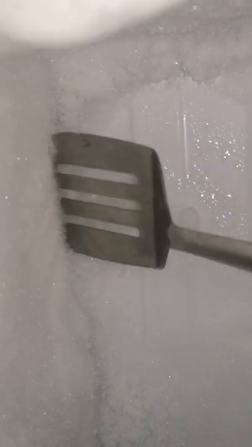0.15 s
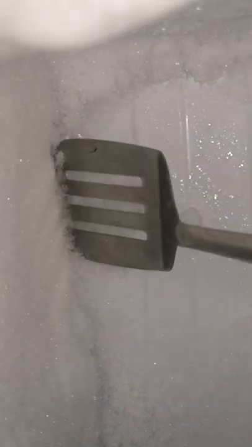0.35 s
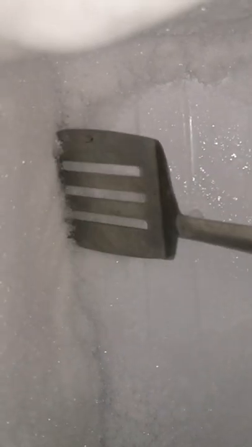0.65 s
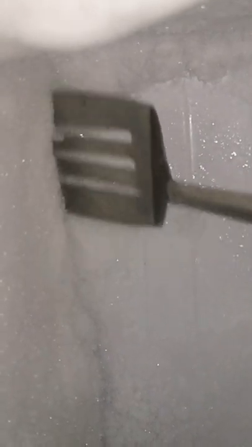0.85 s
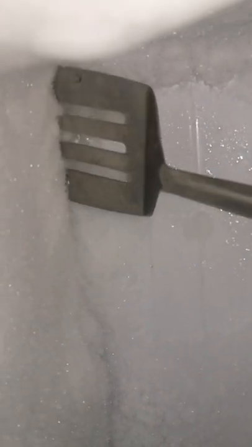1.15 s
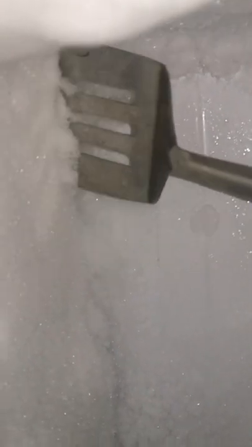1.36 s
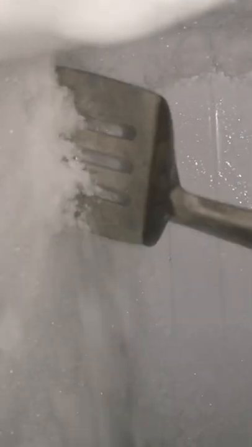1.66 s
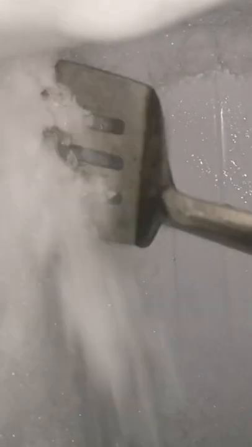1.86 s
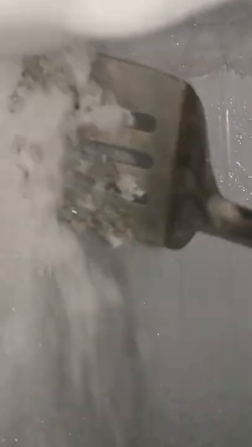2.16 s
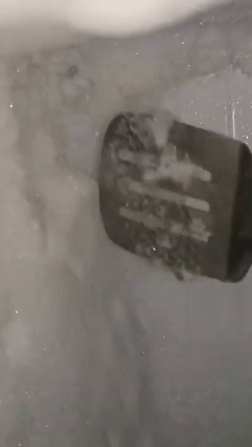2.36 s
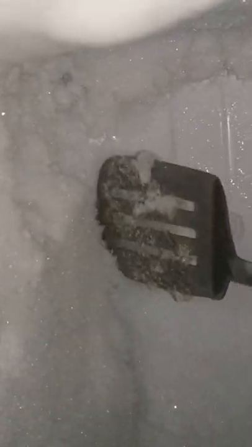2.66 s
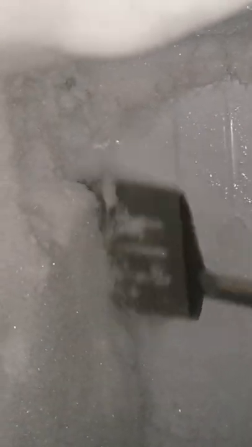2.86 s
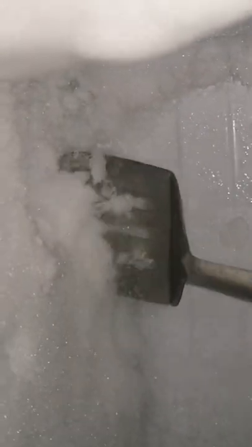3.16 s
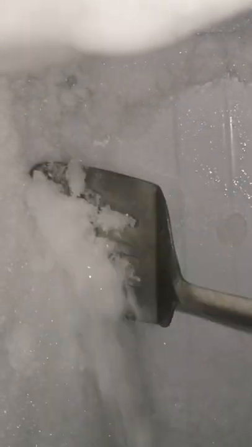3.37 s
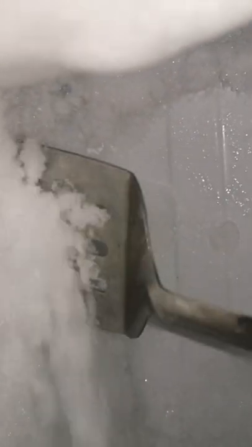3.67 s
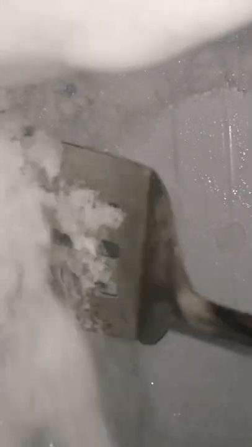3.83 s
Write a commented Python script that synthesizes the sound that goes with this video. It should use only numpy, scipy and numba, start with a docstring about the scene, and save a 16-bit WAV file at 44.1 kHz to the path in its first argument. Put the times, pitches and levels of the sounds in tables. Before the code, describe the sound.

A metal spatula scrapes freezer frost: light ticking scratches first, then a long gritty stroke, a short pause with falling crumbs, and a louder crunching stroke. Close stereo microphone inside the compartment, faint low hum underneath.

```python
"""Inside a freezer, close to a slotted metal spatula, in stereo: compressor hum and cabinet rumble lie underneath throughout.
First come light pecks at the frosted wall: ice fractures rattle the blade, which rings openly, and the hollow wall booms.
From about 1.2 s a long stroke digs in, the edge sticking and slipping; each slip is a run of tiny fractures.
Around 2.2 to 2.8 s crumbs patter down and larger chips tick as they land; then a second, louder stroke runs to the end.
Bursts of random clicks drive the blade and wall resonances; falling frost is short ticks, the hum is sine lines."""
import sys
import numpy as np
from scipy import signal
from scipy.fft import rfft, irfft, next_fast_len
from scipy.io import wavfile
from numba import njit

SR = 44100
rng = np.random.default_rng(int(sys.argv[2]) if len(sys.argv) > 2 else 0)


def log_audio(samples):
    """Write samples as a 16-bit WAV file to the path given in sys.argv[1]."""
    # one column per channel
    frames = np.atleast_2d(samples).T
    # limit to full scale, then quantise
    limited = np.clip(frames, -1, 1)
    pcm = np.round(limited * 32767).astype(np.int16)
    wavfile.write(sys.argv[1], SR, pcm)


N = 176400

# Compressor's steady hum lines: f/Hz, level/dB (rms)
HUM_LINES = [(46.5, -60), (147.6, -59)]
# Its strongest line swells and sinks: t/s, level/dB (rms)
DRONE_LEVEL = [(0, -48), (.12, -45), (.4, -44), (.52, -52), (.8, -48.5), (1.05, -41.5), (1.3, -49),
               (1.55, -42.5), (2.0, -46.5), (2.33, -42), (2.52, -51), (2.74, -52.5), (2.95, -37.5),
               (3.2, -46.5), (4, -48)]
DRONE_HZ = 98.5
# Loose rumble of the cabinet: f/Hz, t60/s, level/dB (rms)
RUMBLE_MODES = [(19.8, .5, -60), (44.8, 1, -46.5), (68.6, 0.15, -51.5)]
# Outline of the room tone: f/Hz, relative level/dB
ROOM_OUTLINE = [(15, -12), (35, -3), (65, 3), (110, 12), (180, -12), (300, -8), (700, -33), (2500, -34),
                (7000, -30), (15000, -63)]
ROOM_DB = -58  # rms

# Slips of the edge through the frost: t/s, length/s, drive level/dB, brightness/dB (before HISS_DB)
EDGE_SLIPS = [(0.005, 0.081, -37.5, -14), (0.12, 0.018, -37.5, -12.5), (0.146, 0.0073, -34, -16.5),
              (0.264, 0.021, -45.5, -8), (0.366, 0.05, -45.5, -10), (0.417, 0.042, -52.5, -7.5),
              (0.54, 0.042, -43, -12), (0.583, 0.025, -40.5, -9.5), (0.614, 0.024, -43, -10.5),
              (0.663, 0.018, -41, -15), (0.74, 0.048, -50, -14.5), (0.807, 0.0092, -44, -14),
              (0.882, 0.035, -41.5, -8), (0.941, 0.015, -32.5, -9), (0.994, 0.047, -44, -5.5),
              (1.069, 0.008, -37, -9.5), (1.082, 0.03, -42, -6), (1.115, 0.05, -29, -12.5),
              (1.168, 0.024, -37, -10.5), (1.225, 0.016, -25, -7.5), (1.275, 0.018, -29.5, -11.5),
              (1.305, 0.005, -26, -15), (1.311, 0.0076, -25, -8), (1.335, 0.039, -26.5, -7),
              (1.406, 0.047, -25.5, -9), (1.459, 0.027, -24.5, -10), (1.5, 0.032, -25.5, -13.5),
              (1.56, 0.051, -25, -9), (1.638, 0.071, -25.5, -8), (1.717, 0.085, -27.5, -9),
              (1.816, 0.017, -30, -14), (1.864, 0.09, -27, -10.5), (1.933, 0.058, -24, -8.5),
              (2.01, 0.012, -27.5, -11), (2.079, 0.11, -25.5, -10.5), (2.199, 0.0074, -27, -11),
              (2.252, 0.021, -32.5, -17), (2.287, 0.039, -35.5, -8.5), (2.767, 0.015, -49.5, -9),
              (2.781, 0.04, -38.5, -15), (2.827, 0.077, -31.5, -12), (2.951, 0.018, -27.5, -7),
              (3.048, 0.016, -24, -5), (3.072, 0.016, -16.5, -12), (3.096, 0.0083, -20, -11),
              (3.129, 0.0096, -23.5, -19), (3.158, 0.0057, -23, -10), (3.176, 0.024, -28.5, -21),
              (3.198, 0.014, -20.5, -11.5), (3.222, 0.016, -20.5, -10), (3.245, 0.023, -23.5, -15),
              (3.273, 0.032, -19, -8.5), (3.325, 0.007, -18, -9), (3.35, 0.0075, -18.5, -8.5),
              (3.377, 0.026, -14, -10.5), (3.43, 0.071, -17, -21), (3.505, 0.26, -20, -7),
              (3.59, 0.054, -17.5, -8), (3.668, 0.042, -19, -13), (3.877, 0.098, -21.5, -7)]
ATTACK_S, RELEASE_S = 0.0032, 0.0036  # linear rise, and time constant of the fall
# The edge grinding on between slips: t/s, drive level/dB
EDGE_DRAG = [(0, -40.5), (.16, -50.5), (.24, -57), (.5, -60), (.86, -60.5), (1.0, -44), (1.21, -46.5),
             (1.27, -42.5), (1.4, -28.5), (1.75, -41), (1.85, -45.5), (1.92, -24.5), (2.04, -41.5),
             (2.2, -36.5), (2.32, -47), (2.36, -59), (2.75, -71), (2.8, -40), (2.92, -38), (3.03, -42.5),
             (3.2, -35.5), (3.36, -22.5), (3.5, -16), (3.7, -24.5), (3.84, -24.5), (4, -25.5)]
FRACTURES_PER_S, FRACTURE_SPREAD_DB = 3900, 2.5
JUDDER_HZ, JUDDER_DB = 330, 1  # fast chatter of the edge
STUTTER_HZ, STUTTER_DB = 68.4, 0.2  # slower stutter
GRIT_HZ, GRIT_DB = 110.4, 1.5  # the treble flickers from crystal to crystal
HISS_DB = 11.5  # lift of the slips' treble; the drag keeps its own level

# Colour of the blade: f/Hz, left relative level/dB, right relative level/dB
BLADE_COLOUR = [(71, -90, -49), (210, -44, -45), (654, -20, -14.5), (990, -8.5, -20), (1203, 0, -9.5),
                (1370, 0, -10), (1634, -3, -17), (1790, 1.5, -15), (2190, -4, -9.5), (2340, -1.5, -13.5),
                (2870, -2.5, -17.5), (3360, -14, -15), (4330, -19.5, -19), (5050, -21, -14.5),
                (5460, -19.5, -14), (5650, -18, -12.5), (6650, -16.5, -23.5), (7600, -15.5, -13),
                (7740, -14, -18.5), (8400, -21.5, -27.5), (9200, -24.5, -15.5), (9950, -31, -22.5),
                (11900, -25.5, -29.5), (12700, -40, -28.5), (13900, -27.5, -29), (14300, -36.5, -51)]
BLADE_DB, BLADE_T60_S, BRIGHT_HZ = -0.5, 0.016, 4160  # treble starts at BRIGHT_HZ
# Thin ringing of the steel: f/Hz, t60/s, relative level/dB (before STEEL_DB)
STEEL_MODES = [(1870, .05, -32), (4840, 0.033, -21), (6850, 0.045, -33), (7960, 0.031, -30),
               (10300, 0.033, -31), (12200, 0.065, -35), (14000, .06, -42)]
STEEL_DB = -6
# Main bending resonance, shifting with the frost on the blade: t/s, f/Hz, relative level/dB (before BEND_DB)
BEND_PATH = [(0, 1940, -28), (.28, 2570, 4), (.6, 2750, 4), (.95, 2700, -6), (1.14, 2580, 6.5),
             (1.4, 2430, -11), (1.7, 2390, 1.5), (1.97, 1920, -27), (2.3, 2200, -14), (2.87, 2340, -4),
             (3.08, 2500, 2), (3.3, 2500, -10), (3.6, 2540, 3), (3.8, 1850, -5), (4, 1760, 2)]
BEND_WIDTH_HZ, BEND_DB = 540.0, -11.5  # width of each of two filters in a row
# Dull crunch of packed frost: t/s, level/dB relative to the blade's drive
CRUNCH_LEVEL = [(0, 0.5), (.3, -5.5), (.6, -6), (.95, -7), (1.3, -5.5), (1.7, -4.5), (2.15, -4),
                (2.3, -4.5), (2.85, -5.5), (2.96, -5.5), (3.08, -10.5), (3.25, -14), (3.6, -5.5), (4, -5.5)]
# Colour of the crunch: f/Hz, relative level/dB
CRUNCH_OUTLINE = [(100, -53), (360, -9), (580, 0), (800, -1), (1050, 7.5), (1350, 2.5), (2000, -21.5),
                  (6000, -54)]
RIGHT_DB = -21  # bend, crunch and catches on the right, before the blade's turn
SCATTER = 0.33  # share of fractures that reach the two sides in opposite sign
# Gain of rasp and catches on the right as the blade turns: t/s, level/dB
BLADE_TURN = [(0, 1.5), (.16, 5), (.3, 3.5), (.6, 2), (.97, 3), (1.2, -1.5), (1.45, 1), (1.8, 0.5),
              (2.25, 1), (2.87, 2.5), (3.08, 1), (3.33, -2.5), (3.55, 1), (4, -5)]
# Modes of the blade while not buried in frost: f/Hz, t60/s, level/dB, right gain relative to left
FREE_BLADE_MODES = [(603, 0.1, -7.5, -1.1), (885, 0.069, -5, -0.49), (1119, 0.09, -9, -0.11),
                    (2066, .025, -15, 0.84), (2296, .03, -13, 1.4), (3110, 0.048, -14, 0.51)]
# How freely they ring: t/s, level/dB relative to the fractures
FREE_LEVEL = [(0, 0), (.16, 2.5), (.3, -5), (.6, -3.5), (.85, 1), (.97, -3), (1.15, -8.5), (1.4, -9),
              (2.2, -14), (2.8, 3), (2.9, 0), (3.08, -10.5), (3.3, -10), (3.6, -15), (4, -18)]
MODES_LOW_HZ = 183  # free-blade and compartment modes are high-passed below this
BOX_T60_S, BOX_DB = 0.054, -8.5  # echo in the compartment, level relative to the near sound

# How strongly fractures reach the wall as the blade digs in: t/s, boom level/dB, knock level/dB
# (before BOOM_DB and KNOCK_DB)
DIG_DEPTH = [(0, -11.5, -6.5), (.3, -17, -21), (.85, -10, -10), (1.0, -4, -6), (1.13, -13, -10.5),
             (1.37, 0, -8), (1.5, -15, -12), (1.6, -5.5, -6), (1.75, -2, -6.5), (2.0, -3.5, -2.5),
             (2.2, 0, -3), (2.33, 0.5, -7), (2.84, -14, -20), (2.95, -0.5, -6), (3.08, -11, -13),
             (3.22, -3.5, -10.5), (3.42, -14, -9), (3.6, 0.5, -0.5), (3.75, -3.5, 1), (3.87, 4, -4),
             (4, -12.5, 2.5)]
# Modes of the hollow wall: f/Hz, t60/s, relative level/dB
BOOM_MODES = [(120, 0.1, -4.5), (146.64, 0.29, 3.5), (173.1, 0.41, 0), (201.6, 0.11, -10),
              (237.3, 0.22, -7.5)]
# Modes of the compartment: f/Hz, t60/s, relative level/dB, right gain relative to left
KNOCK_MODES = [(246.5, .15, 5, 0.93), (312.4, 0.15, 3.5, 0.98), (406.6, 0.13, 7.5, 1), (467.6, 0.1, 5.5, 1),
               (545, 0.3, 12, -1.06), (580, 0.075, 10.5, -0.77), (676, 0.055, 17, -0.53),
               (753, 0.085, 8, -0.31), (844, 0.059, 10.5, -0.31)]
BOOM_DB, KNOCK_DB = -4, -3.5

# Falling crumbs: t/s, level/dB (before ringing, echo and colour)
CRUMB_FALL = [(0, -53), (1.2, -101), (1.6, -76), (2.25, -45), (2.35, -60), (2.44, -45.5), (2.48, -58.5),
              (2.62, -53), (2.74, -60.5), (3.1, -50), (4, -31)]
# Colour of the crumbs: f/Hz, relative level/dB
CRUMB_OUTLINE = [(70, -68), (200, -7), (450, 2.5), (900, -14), (2500, -3), (4500, -11), (7500, -1.5),
                 (9500, -12.5), (12000, -18), (15000, -17)]
CRUMBS_PER_S, CRUMB_SPREAD_DB = 750, 3
PATTER_S = 0.00063  # time constant of one tick
CRUMB_LOW_HZ, CRUMB_HIGH_HZ = 4320, 10300
CRUMB_RING_S, CRUMB_RING_DB = 0.007, -16.52  # t60, and level relative to the tick
CRUMB_BOX_DB = -1  # compartment echo relative to the ticks

# Hard catches in which the edge rings: t/s, length/s, f/Hz, level/dB relative to the fractures
HARD_CATCHES = [(0.255, 0.019, 2510, 4), (0.537, 0.025, 2660, -2), (0.937, 0.025, 2900, 5.5),
                (1.333, 0.12, 2850, -15), (2.844, 0.14, 3410, -5.5), (3.066, 0.0202, 1210, -6.5),
                (3.196, 0.2, 2454, -6.5), (3.47, 0.092, 2750, -11.5), (3.607, 0.057, 2370, -4)]
CATCH_WIDTH_HZ = 187
# Lumps of frost breaking off and thumping the wall: t/s, boom level/dB, knock level/dB
# (before BOOM_DB and KNOCK_DB)
LUMP_THUDS = [(0.371, -16, -23), (0.958, -26, -7.5), (1.349, 5.5, -3), (1.604, -7, 7), (1.871, 3.5, 1),
              (2.123, -10, 16.5), (2.331, -8, -5), (2.911, -3, -6), (3.455, -1, 13), (3.6, 8, 20),
              (3.644, 10, 10), (3.692, -18, 19), (3.724, 15.5, -1), (3.92, -15, 19)]
THUD_S = 0.0029  # length of the soft push
# Larger chips landing: t/s, level/dB (before CHIP_DB), f/Hz, t60/s
CHIP_LANDINGS = [(2.2278, -23, 6900, 0.018), (2.237, -28, 7000, 0.027), (2.268, -33, 9000, 0.019),
                 (2.364, -46, 7100, .012), (2.3729, -44, 8000, .012), (2.379, -41, 3180, 0.016),
                 (2.4097, -37, 4900, 0.016), (2.427, -41, 5200, 0.029), (2.448, -28.5, 6360, 0.0094),
                 (2.484, -49, 3200, .02), (2.5156, -42, 7700, .006), (2.5404, -27, 8900, 0.0065),
                 (2.571, -43, 8000, .012), (2.591, -37, 6400, .01), (2.617, -35, 7000, .012),
                 (2.685, -38, 5750, 0.019)]
CHIP_DB, CHIP_WIDTH_HZ = -3.5, 2500.0

TOP_HZ = 15300  # upper limit of the recorder


def undb(db):
    """Decibels to gain."""
    return np.exp(np.asarray(db) * (np.log(10) / 20))


def unit(x):
    """Scale to rms 1."""
    return x / np.sqrt(np.mean(x ** 2))


def curve(table, axis=1):
    """Gain over time from a column of decibels."""
    rows = np.array(table)
    return undb(np.interp(np.arange(N) / SR, rows[:, 0], rows[:, axis]))


def walk(rate):
    """Random wander of rms 1, in straight lines between rate new points a second."""
    position = np.arange(N) / SR * rate
    return unit(np.interp(position, np.arange(4096), rng.standard_normal(4096)))


def through(x, response):
    """Play x through an impulse response."""
    size = next_fast_len(N + 16384, real=True)
    return irfft(rfft(x, size) * rfft(response, size), size)[..., :N]


def colour(points, axis=1, size=2048):
    """Causal (minimum-phase) impulse response with the given outline in Hz and dB."""
    rows = np.array(points)
    hz = np.maximum(np.arange(size // 2 + 1) * SR / size, 1)
    db = np.interp(np.log(hz), np.log(rows[:, 0]), rows[:, axis])
    cepstrum = irfft(np.log(undb(db)))
    # folding the cepstrum forward in time makes the response causal
    cepstrum[1:size // 2] *= 2
    cepstrum[size // 2 + 1:] = 0
    return irfft(np.exp(rfft(cepstrum)))


def ring(hz, t60, size=16384):
    """One decaying mode of unit energy."""
    t = np.arange(size) / SR
    mode = np.sin(2 * np.pi * hz * t) * np.exp(-np.log(1000) * t / t60)
    return mode / np.linalg.norm(mode)


def both_sides(modes):
    """Left and right response of a set of modes; neighbours swing in opposite sign."""
    sides = np.zeros((2, 16384))
    for k, (hz, t60, db, right_gain) in enumerate(modes):
        sides += (-1) ** k * undb(db) * np.outer([1, right_gain], ring(hz, t60))
    low_cut = signal.butter(2, MODES_LOW_HZ, "high", fs=SR, output="sos")
    return signal.sosfilt(low_cut, sides)


def tail(t60, size=8192):
    """Dense decaying resonances of unit energy, evened out across frequency."""
    fade = np.exp(-np.log(1000) * np.arange(size) / SR / t60)
    response = rng.standard_normal(size) * fade
    flat = irfft(np.exp(1j * np.angle(rfft(response))))
    response = flat * np.sqrt(fade)
    return response / np.linalg.norm(response)


def grains(rate, spread_db):
    """Random clicks of uneven size and either sign, rms 1."""
    clicks = np.zeros(N)
    hit = rng.random(N) < rate / SR
    chance = np.clip(rng.standard_normal(N)[hit], -2, 2)
    clicks[hit] = undb(spread_db * chance) * np.sign(rng.random(N)[hit] - .5)
    return unit(clicks)


@njit
def resonate(x, hz, width):
    """Band-pass whose centre moves, gain 1 at the centre."""
    y, band, low = np.empty(len(x)), 0., 0.
    for i in range(len(x)):
        g, damping = np.tan(np.pi * hz[i] / SR), width / hz[i]
        # the tiny offset keeps the filter state from vanishing into slow, minute numbers
        v = (band + g * (x[i] + 1e-18 - low)) / (1 + g * (g + damping))
        band, low, y[i] = 2 * v - band, low + 2 * g * v, damping * v
    return y


def hum_line(hz):
    """A sine of rms 1 at a random phase."""
    t = np.arange(N) / SR
    return np.sqrt(2) * np.sin(2 * np.pi * (hz * t + rng.random()))


def compressor():
    """Motor hum: steady sine lines under a stronger one that swells and sinks."""
    steady = sum(undb(db) * hum_line(hz) for hz, db in HUM_LINES)
    return curve(DRONE_LEVEL) * hum_line(DRONE_HZ) + steady


def cabinet_rumble():
    """Loose low modes of the cabinet, each driven by its own noise."""
    out = np.zeros(N)
    for hz, t60, db in RUMBLE_MODES:
        out += undb(db) * unit(through(rng.standard_normal(N), ring(hz, t60)))
    return out


def room_tone():
    """Steady noise with the colour of the room."""
    return undb(ROOM_DB) * unit(through(rng.standard_normal(N), colour(ROOM_OUTLINE, size=8192)))


def fractures():
    """Force on the edge from breaking ice, and the same force weighted by each slip's brightness."""
    t = np.arange(N) / SR
    effort = curve(EDGE_DRAG)
    crisp = effort * undb(-HISS_DB)
    for start, length, db, bright_db in EDGE_SLIPS:
        near = (t > start - ATTACK_S) & (t < start + length + 10 * RELEASE_S)
        age = t[near] - start
        rise = np.clip(age / ATTACK_S + .5, 0, 1)
        slip = undb(db) * rise * np.exp(-np.maximum(age - length, 0) / RELEASE_S)
        effort[near] = np.maximum(effort[near], slip)
        crisp[near] = np.maximum(crisp[near], slip * undb(bright_db))
    unsteady = undb(JUDDER_DB * walk(JUDDER_HZ) + STUTTER_DB * walk(STUTTER_HZ))
    cracks = unit(grains(FRACTURES_PER_S, FRACTURE_SPREAD_DB) * unsteady)
    flicker = undb(HISS_DB + GRIT_DB * walk(GRIT_HZ))
    return cracks * effort, cracks * crisp * flicker


def blade(force, crisp):
    """The rasp: fractures rattle the frost-damped blade; it bends, rings thinly and crunches the frost."""
    treble = signal.butter(2, BRIGHT_HZ, "high", fs=SR, output="sos")
    bend_hz = np.interp(np.arange(N) / SR, *np.array(BEND_PATH)[:, :2].T)
    bend_gain = np.sqrt(2 * SR / np.pi / BEND_WIDTH_HZ) * curve(BEND_PATH, axis=2) * undb(BEND_DB)
    steel = sum(undb(db) * ring(hz, t60) for hz, t60, db in STEEL_MODES)
    tones = [colour(BLADE_COLOUR, axis=1), colour(BLADE_COLOUR, axis=2)]
    dull = colour(CRUNCH_OUTLINE)
    signs = [1, np.sign(rng.random(N) - SCATTER)]
    sides = []
    for tone, sign, gain in zip(tones, signs, [1, undb(RIGHT_DB)]):
        # above BRIGHT_HZ the crisp force takes the place of the plain one
        brightened = sign * force + signal.sosfiltfilt(treble, sign * (crisp - force))
        drive = through(brightened, tail(BLADE_T60_S))
        rasp = undb(BLADE_DB) * through(drive, tone / np.linalg.norm(tones[0]))
        bend = resonate(resonate(drive, bend_hz, BEND_WIDTH_HZ), bend_hz, BEND_WIDTH_HZ) * bend_gain
        crunch = through(drive * curve(CRUNCH_LEVEL), dull / np.linalg.norm(dull))
        thin_ring = undb(STEEL_DB) * through(drive, steel)
        sides.append(rasp + gain * (bend + crunch) + thin_ring)
    return np.array(sides)


def free_blade(force):
    """Before it sinks into the frost the blade rings more openly, with a hollow note."""
    return through(force * curve(FREE_LEVEL), both_sides(FREE_BLADE_MODES))


def wall(force):
    """The hollow wall booms alike on both sides; standing waves in the compartment differ left and right."""
    modes = sum((-1) ** k * undb(db) * ring(hz, t60) for k, (hz, t60, db) in enumerate(BOOM_MODES))
    waves = both_sides(KNOCK_MODES)
    boom_drive = force * curve(DIG_DEPTH, axis=1) + thuds(axis=1)
    knock_drive = force * curve(DIG_DEPTH, axis=2) + thuds(axis=2)
    boom = through(boom_drive, modes / np.linalg.norm(modes))
    knock = through(knock_drive, waves) / np.linalg.norm(waves[0])
    return undb(BOOM_DB) * boom + undb(KNOCK_DB) * knock


def crumbs(count=10):
    """Loose frost patters down on many spots, each with its own tick and pitch; the compartment smears them."""
    out = np.zeros((2, N))
    fall = curve(CRUMB_FALL) / np.sqrt(count)  # the spots together reach the table's level
    fade = np.exp(-np.arange(512) / SR / PATTER_S)
    for hz in np.geomspace(CRUMB_LOW_HZ, CRUMB_HIGH_HZ, count):
        ticks = rng.standard_normal((2, len(fade))) * fade
        ticks /= np.linalg.norm(ticks)
        ticks += undb(CRUMB_RING_DB) * ring(hz, CRUMB_RING_S, size=512)
        out += through(grains(CRUMBS_PER_S / count, CRUMB_SPREAD_DB) * fall, ticks)
    box = np.array([tail(BOX_T60_S) for _ in range(2)])
    out = out + undb(CRUMB_BOX_DB) * through(out, box)
    tone = colour(CRUMB_OUTLINE)
    return through(out, tone / np.linalg.norm(tone))


def catches(force):
    """Where the edge catches hard ice, the fractures set it ringing at one pitch."""
    t, out = np.arange(N) / SR, np.zeros(N)
    t60 = np.log(1000) / np.pi / CATCH_WIDTH_HZ
    for start, length, hz, db in HARD_CATCHES:
        held = (t > start) & (t < start + length)
        rung = np.convolve(force[held], ring(hz, t60, size=512))
        first = np.argmax(held)
        out[first:first + len(rung)] += undb(db) * rung
    return out * np.array([[1], [undb(RIGHT_DB)]])


def thuds(axis=1):
    """A soft push on the wall for each lump that breaks off."""
    out = np.zeros(N)
    push = np.sin(np.pi * np.minimum(np.arange(512) / SR / THUD_S, 1)) ** 2
    for row in LUMP_THUDS:
        out[int(row[0] * SR)] += undb(row[axis])
    return through(out, push / push.sum())


def chips(size=4096):
    """Larger chips land, each a decaying tick of band-passed noise with its own pitch and length."""
    out, t = np.zeros((2, N)), np.arange(size) / SR
    for at, db, hz, t60 in CHIP_LANDINGS:
        first = int(at * SR)
        fade = np.exp(-np.log(1000) * t / t60)
        for side in out:
            noise = rng.standard_normal(size)
            tick = unit(resonate(noise, np.full(size, float(hz)), CHIP_WIDTH_HZ))
            side[first:first + size] += undb(db + CHIP_DB) * tick * fade
    return out


def scene():
    """The close blade echoes briefly in the compartment, over the falling frost, the wall and the hum."""
    background = compressor() + cabinet_rumble() + room_tone()
    force, crisp = fractures()
    turn = np.array([np.ones(N), curve(BLADE_TURN)])
    near = (blade(force, crisp) + catches(force)) * turn
    box = np.array([through(side, tail(BOX_T60_S)) for side in near])
    spatula = near + undb(BOX_DB) * box + free_blade(force)
    return background + spatula + wall(force) + crumbs() + chips()


def record(dry):
    """The recorder cuts the top with a steep low-pass."""
    return signal.sosfilt(signal.ellip(10, .2, 80, TOP_HZ, fs=SR, output="sos"), dry)


dry = scene()
out = record(dry)
log_audio(out)
```